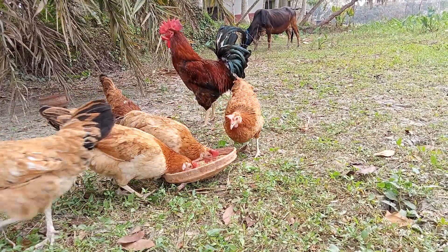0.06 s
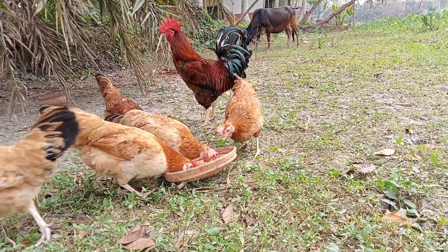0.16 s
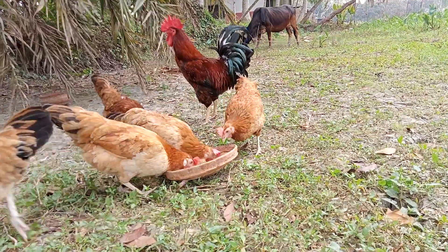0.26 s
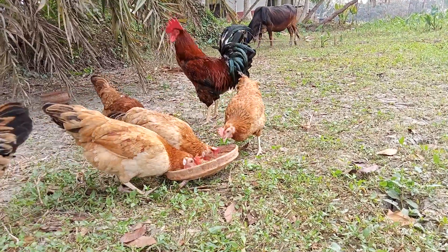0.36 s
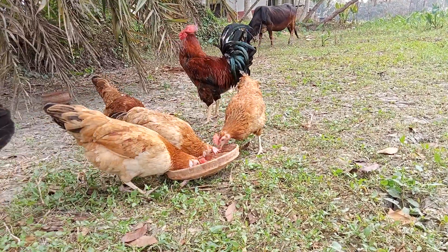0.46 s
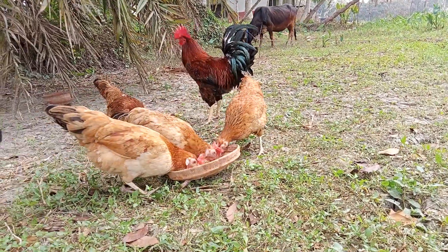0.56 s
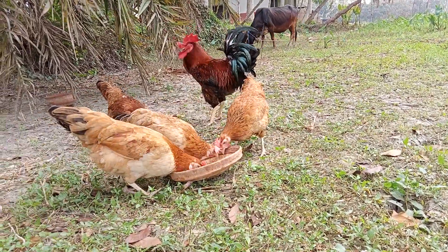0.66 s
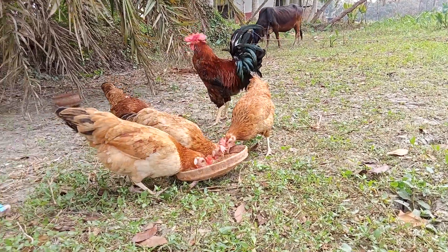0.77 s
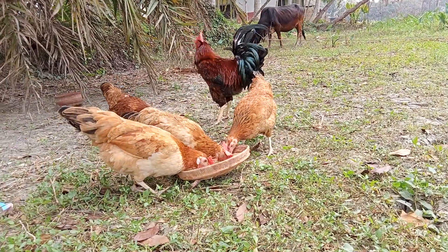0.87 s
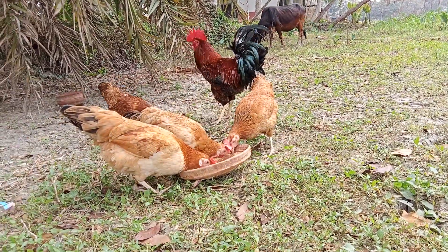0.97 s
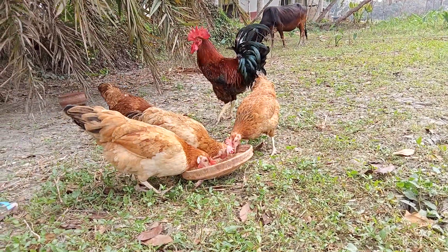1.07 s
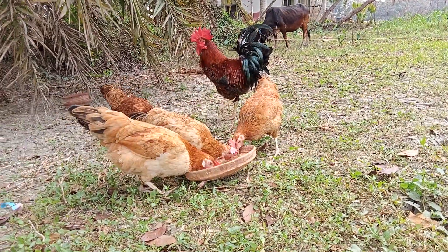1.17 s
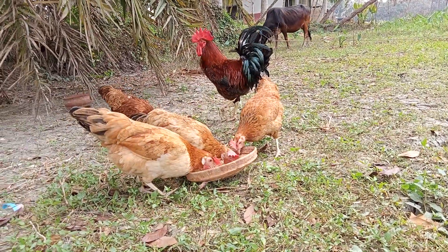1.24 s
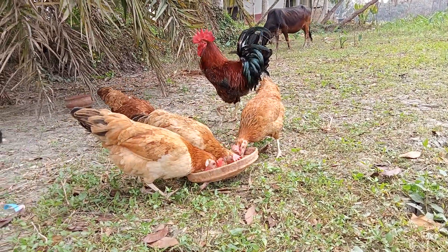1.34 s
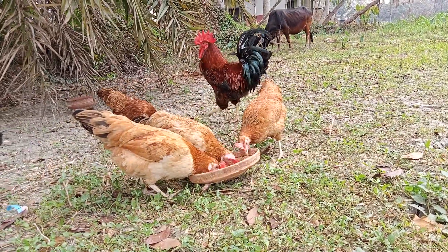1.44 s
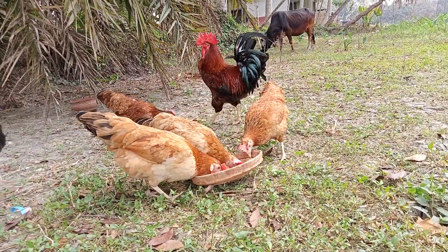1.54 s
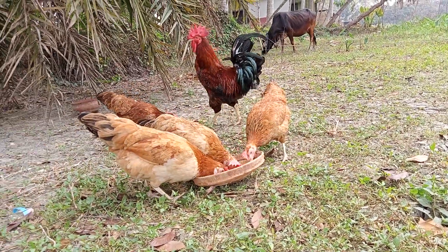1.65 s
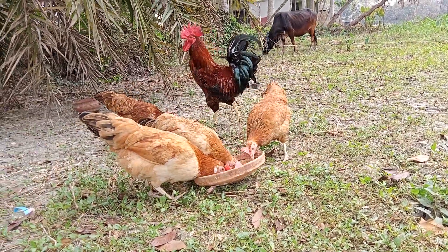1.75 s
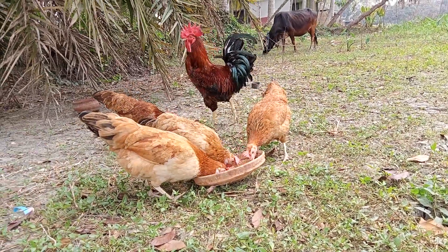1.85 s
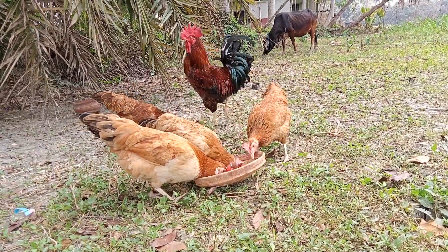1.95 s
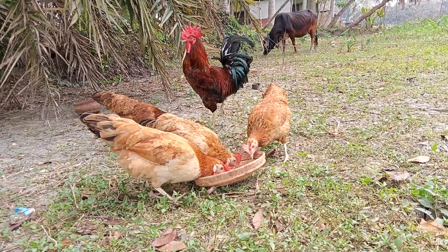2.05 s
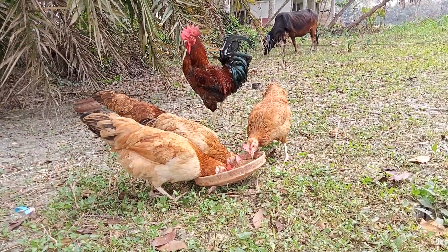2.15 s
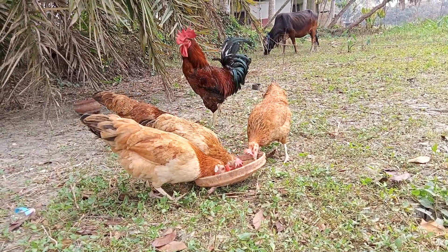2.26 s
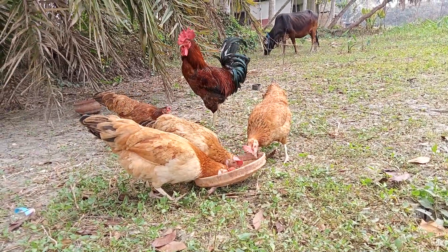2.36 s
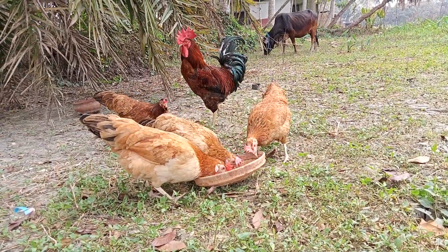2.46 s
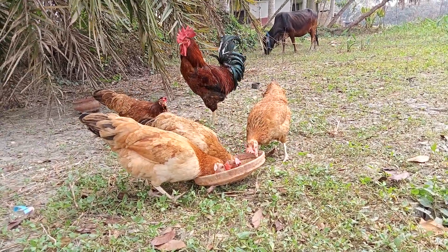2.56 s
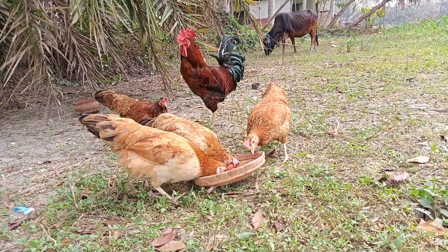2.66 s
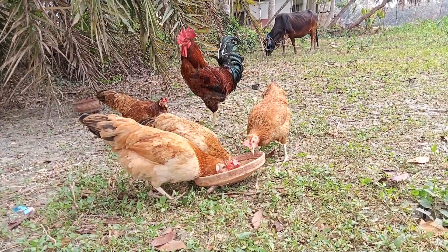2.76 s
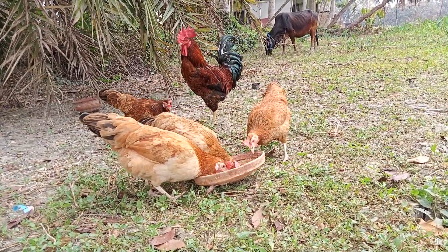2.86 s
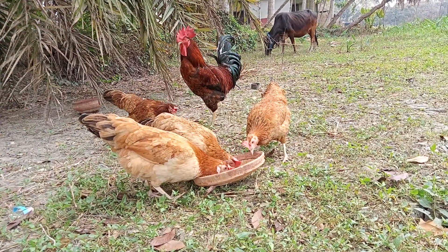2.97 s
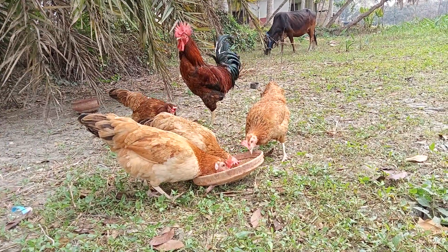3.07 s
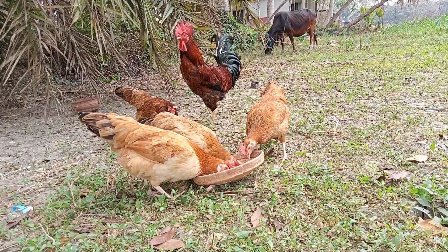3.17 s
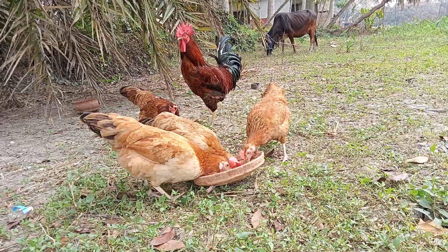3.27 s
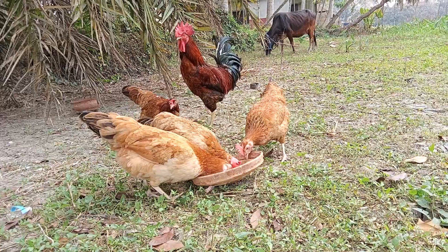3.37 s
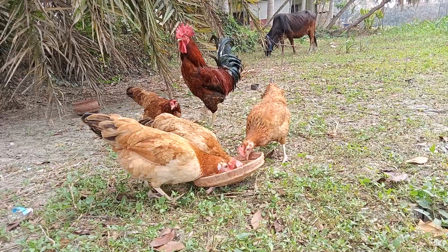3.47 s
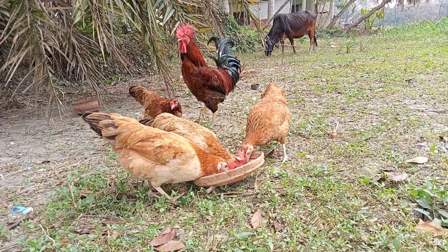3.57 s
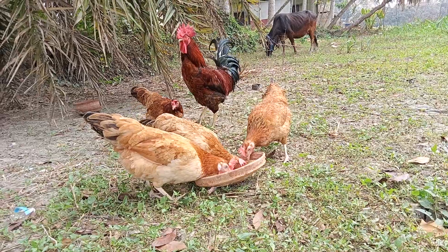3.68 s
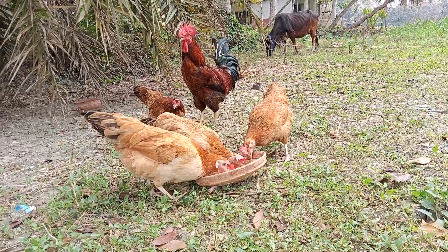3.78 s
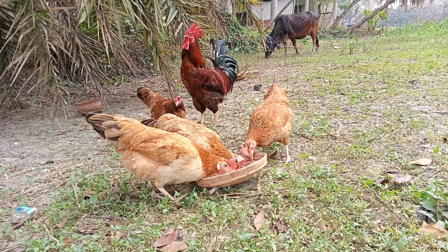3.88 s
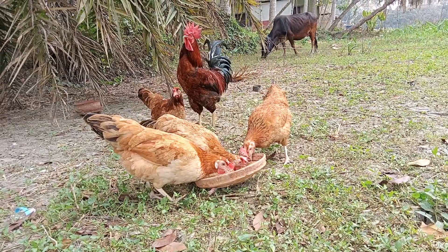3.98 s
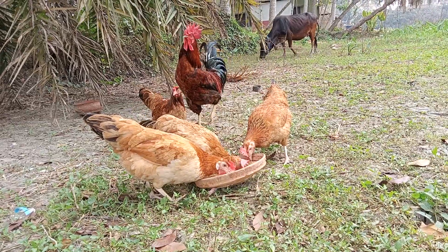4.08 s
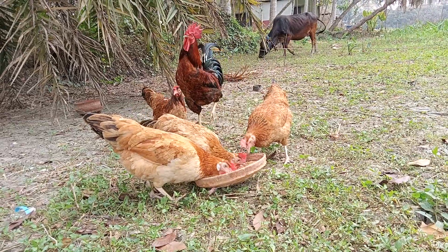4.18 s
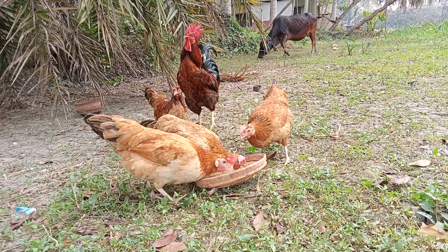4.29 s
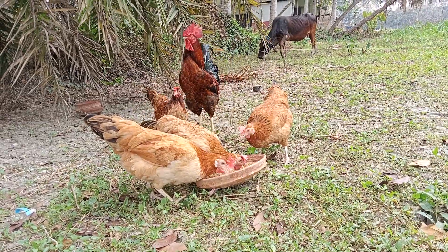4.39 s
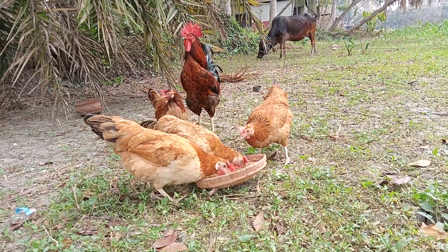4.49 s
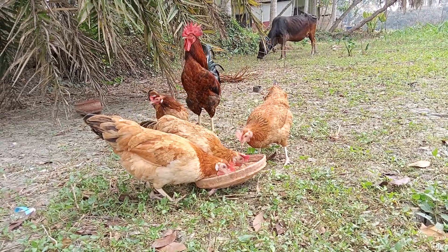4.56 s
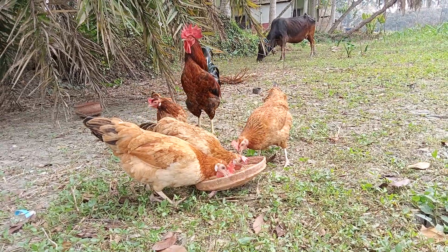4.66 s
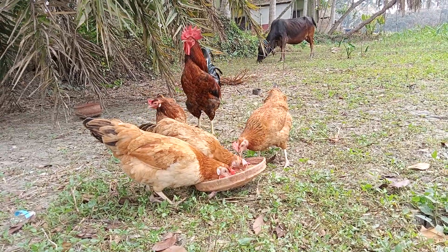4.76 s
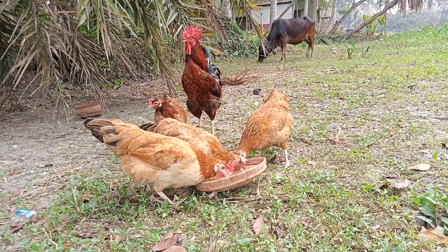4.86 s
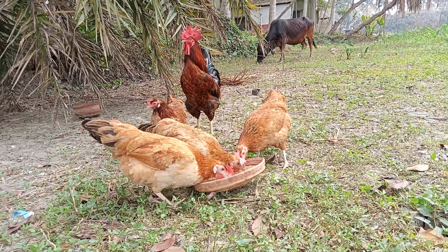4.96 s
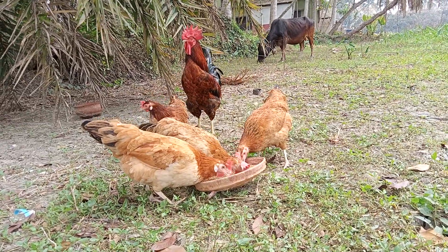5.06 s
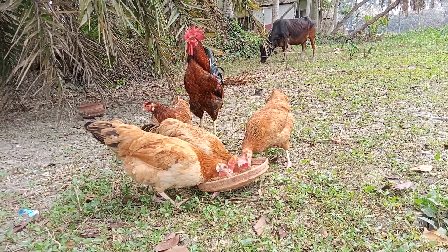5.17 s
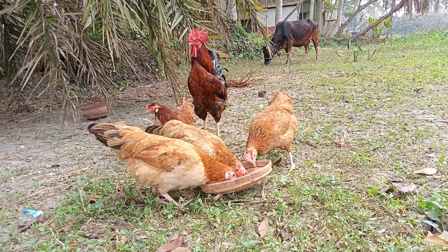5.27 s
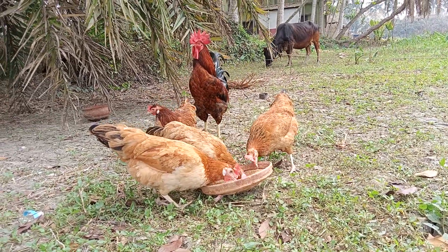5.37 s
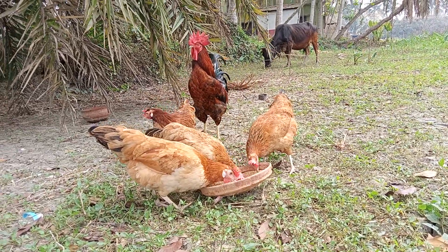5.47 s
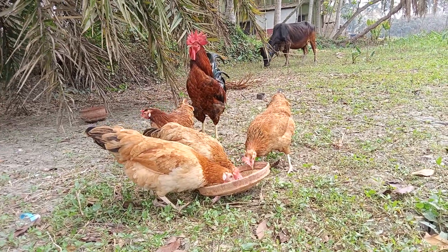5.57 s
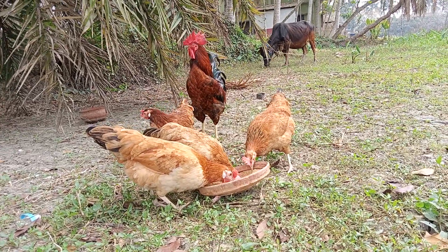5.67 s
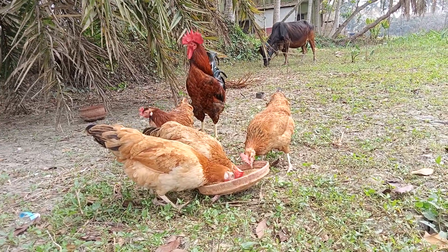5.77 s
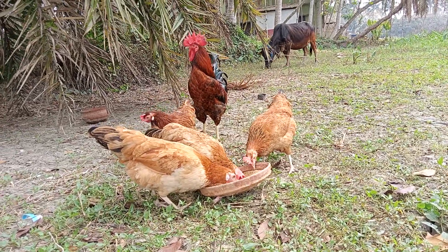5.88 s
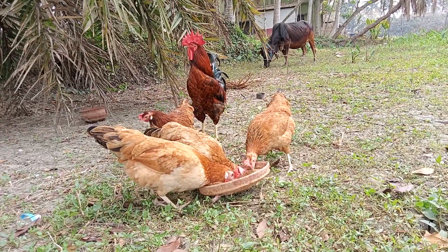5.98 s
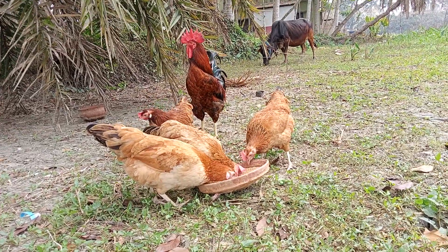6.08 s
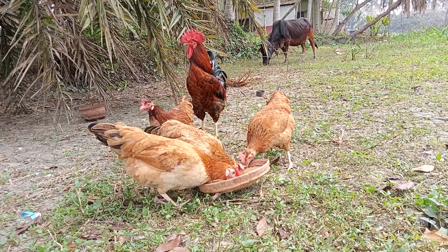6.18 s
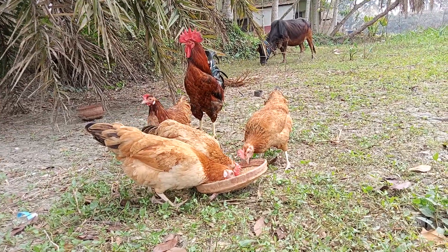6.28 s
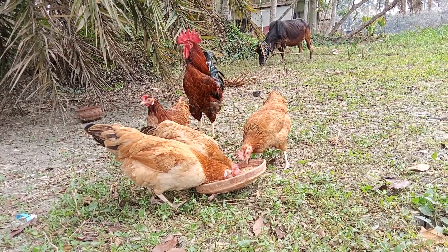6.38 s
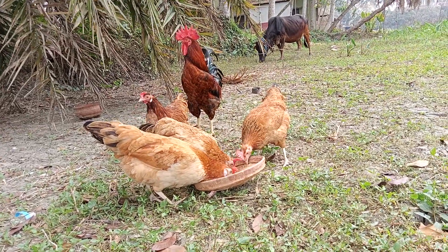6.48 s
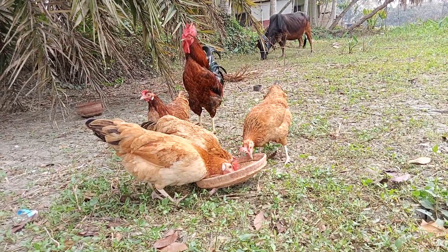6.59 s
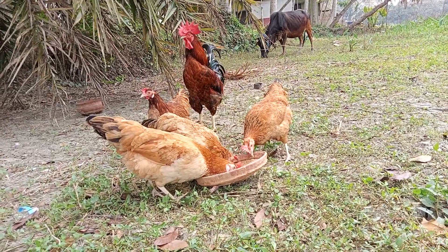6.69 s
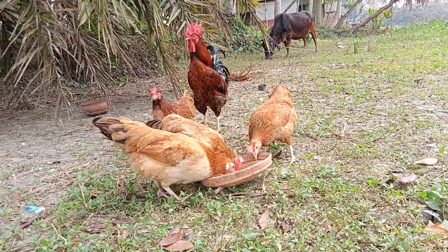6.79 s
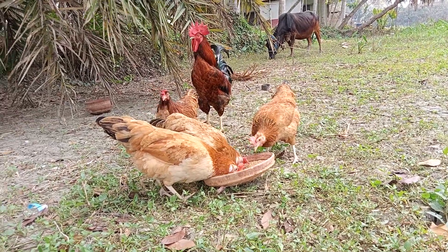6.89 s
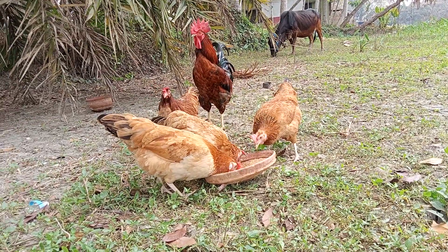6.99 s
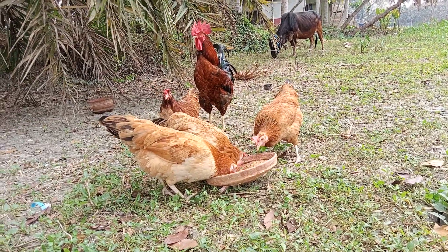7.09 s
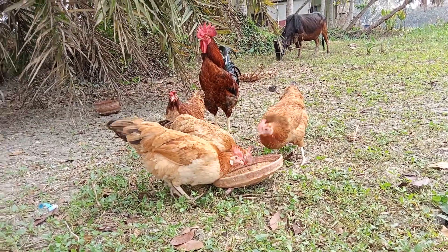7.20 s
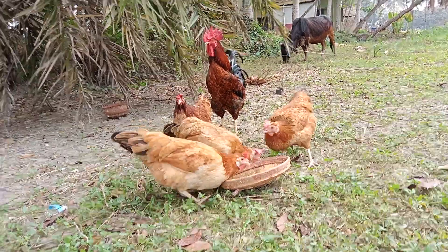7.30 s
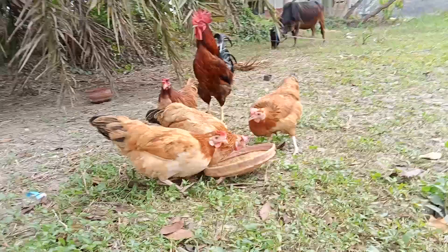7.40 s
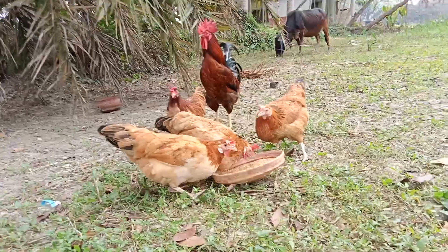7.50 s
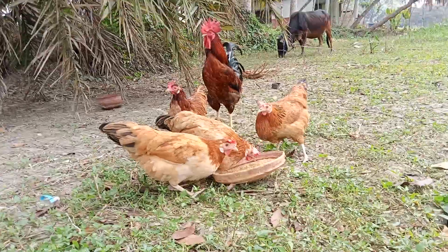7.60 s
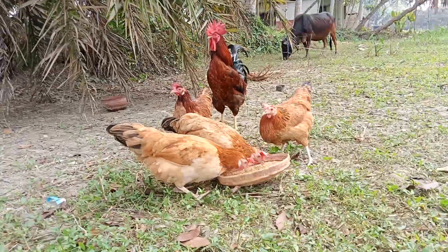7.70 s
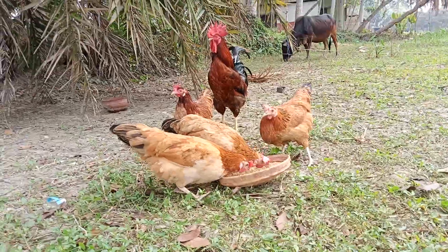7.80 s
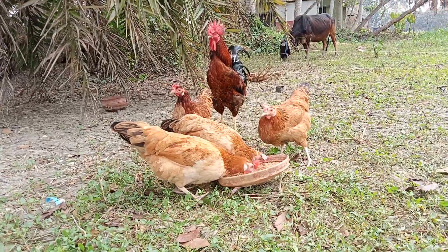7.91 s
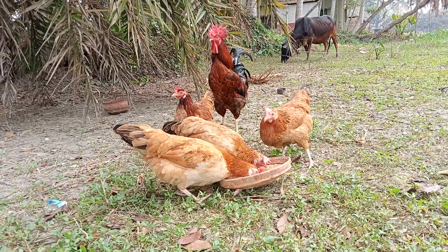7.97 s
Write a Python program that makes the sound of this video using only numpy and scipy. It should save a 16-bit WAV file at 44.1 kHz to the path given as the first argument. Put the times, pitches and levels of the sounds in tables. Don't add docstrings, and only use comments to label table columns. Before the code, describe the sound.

A steady, faint engine putter and soft yard hiss lie beneath birdsong and feeding chickens. Beaks tap lightly on clay, crack grain and stir dry grass; a hen gives one tiny low cluck around two and a half seconds. Echoing birds alternate buzzing downward calls with short three-note phrases and thin whistles. Low wind bumps touch the open-air microphone, and a loud sharp knock lands just before seven seconds, followed by denser pecking and rustling.

```python
import sys
import numpy as np
from scipy import signal
from scipy.fft import rfft, irfft, next_fast_len
from scipy.io import wavfile
from scipy.ndimage import uniform_filter1d

SR = 44100
rng = np.random.default_rng(int(sys.argv[2]) if len(sys.argv) > 2 else 0)


def nominal_scale(level):
    x = np.asarray(level, float) / 20
    return 10 ** x


def store_wav(level_fs):
    pcm = np.round(np.clip(np.atleast_2d(level_fs), -1, 1) * 32767)
    wavfile.write(sys.argv[1], SR, pcm.T.astype(np.int16))


N = 354563


def evened(x):
    return x / np.sqrt(np.mean(x ** 2) + 1e-20)


def add(mix, start_s, sound):
    part = mix[round(start_s * SR):][:len(sound)]
    part += sound[:len(part)]


def during(curve, start_s, sound):
    return curve[round(start_s * SR):][:len(sound)]


def coloured(x, points):
    point_hz, db = np.transpose(points)
    size = next_fast_len(len(x), True)
    hz = np.fft.rfftfreq(size, 1 / SR)
    gain = nominal_scale(np.interp(np.log(hz + 1), np.log(point_hz), db))
    return irfft(rfft(x, size) * gain, size)[:len(x)]


def wander(rate_hz):
    size = max(int(SR / rate_hz), 1)
    return evened(uniform_filter1d(uniform_filter1d(rng.standard_normal(N), size), size))


def ring(modes):
    t = np.arange(0, max(mode[-1] for mode in modes), 1 / SR)
    return sum(nominal_scale(db - 60 * t / t60) * np.sin(2 * np.pi * hz * t) for hz, db, t60 in modes)


def patchy(x, depth_db, tall, long):
    z = signal.stft(x, nperseg=256)[2]
    patches = uniform_filter1d(rng.standard_normal(z.shape), int(tall), 0)
    patches = evened(uniform_filter1d(patches, int(long), 1))
    return evened(signal.istft(z * nominal_scale(depth_db * patches), nperseg=256)[1][:N])


def swells(rows, floor_db):
    t, power = np.arange(N) / SR, nominal_scale(2 * floor_db)
    for start, end, db, rise, fall in rows:
        outside = np.maximum((start - t) / rise, (t - end) / fall)
        power = power + nominal_scale(2 * db - 40 * np.maximum(outside, 0))
    return np.sqrt(power)


# pitch_hz, level_db
TOP_EDGE = [(15600, 0), (15780, -70)]
# loudest_s, level_db, rise_20db_s, fall_20db_s
GUSTS = [(0.0, -52, .1, .19), (.29, -59, .4, .9), (.56, -50, .12, .15), (.86, -40, .1, .3),
         (.94, -42, .2, .16), (1.64, -53, .15, .7), (2.21, -53, .46, 1.1), (2.91, -54, .12, .3),
         (3.72, -56, 1.9, .3), (4.25, -54.5, .7, 1.1), (4.5, -47, .12, .15), (5.3, -53, .9, .09),
         (5.47, -56, .12, 1.9), (6.9, -44, .045, .05), (6.95, -53, .5, .4), (7.115, -45, .08, .1),
         (7.3, -58, .3, .6), (8.04, -60, .2, .1)]
# pitch_hz, level_db (per Hz)
WIND_TONE = [(20, -63), (40, -10), (62, 2), (90, 8), (130, -2), (250, -15), (500, -43), (2000, -90)]
# pitch_hz, level_db (per Hz)
YARD_TONE = [(60, -48), (150, -2), (254, -7), (420, -17), (700, -19.5), (900, -14), (2300, -17.5),
             (3250, -19), (3700, -25), (4500, -29), (5100, -40), (7500, -45.5), (8700, -36), (10500, -52)]


def air():
    calm_db, yard_db = -72, -57.1
    wind = evened(coloured(rng.standard_normal(N) * nominal_scale(2.4 * wander(6.3)), WIND_TONE))
    gusts = nominal_scale(-2.5) * swells([(s, s, *rest) for s, *rest in GUSTS], calm_db)
    wash = patchy(coloured(rng.standard_normal(N), YARD_TONE), depth_db=1.5, tall=2.5, long=24)
    return gusts * wind + nominal_scale(yard_db + 1.45 * wander(4.1)) * coloured(wash, TOP_EDGE)


# cycle_share, peak_db
PUFFS = [
    (0.0, -49),
    (0.108, -57.5),
    (0.253, -62.5),
    (0.431, -51.5),
]
# pitch_hz, level_db, decay_60db_s
PIPE = [(141.4, -4, 0.16), (180.6, 5, 0.035), (107, -18, 0.017), (236, -8, 0.03)]
# cycle_share, peak_db
VALVES = [
    (.09, -52.5),
    (.22, -57.5),
    (.42, -52.5),
    (.69, -57),
]
# pitch_hz, level_db, decay_60db_s
CASING = [(762, -2.5, 0.19), (888, -1, 0.16), (1133, -5.5, 0.049), (1430, -0.5, 0.12), (978, -2, 0.13)]


def engine_hits(table):
    cycle_hz, hits = 11.8825, np.zeros(N)
    cycles = np.arange(int(cycle_hz * N / SR))
    for share, db in table:
        late, size = rng.standard_normal((2, len(cycles)))
        at = (((cycles + share) / cycle_hz - .0015 + .0006 * late) * SR).astype(int)
        hits[np.maximum(at, 0)] = nominal_scale(db + 3.0 * np.clip(size, -3, 1.3))
    return hits


def engine():
    soft = signal.windows.hann(90)
    puffs = signal.fftconvolve(engine_hits(PUFFS), np.convolve(ring(PIPE), soft / soft.sum()))[:N]
    puffs = coloured(puffs, [(30, -43), (70, 1.5)])
    return puffs + signal.fftconvolve(engine_hits(VALVES), nominal_scale(-9.5) * ring(CASING))[:N]


# pitch_hz, level_db (per Hz)
RUSTLE_TONE = [(1760, -34), (3000, 0), (3260, 2.5), (3670, 0.5), (4940, -5.5), (5710, -11.5), (7700, -8),
               (8800, 3), (9700, -11), (12300, -12), (13400, -13), (15000, -6), (15700, -10)]
# loudest_s, level_db, rise_20db_s, fall_20db_s
STIRS = [(0.0, -63.5, .1, .2), (.15, -67, .11, .17), (1.23, -66.5, .055, .2), (1.54, -71.5, .28, .14),
         (1.62, -66.5, .03, .05), (1.75, -66, .046, .17), (1.95, -72, .36, .09), (2.63, -65, .033, .044),
         (2.79, -71, .03, .03), (3.0, -74, .03, .06), (3.4, -65.5, .05, .2), (3.35, -72, .2, .1),
         (3.55, -68.5, .14, .5), (3.83, -66, .03, .15), (3.99, -68, .06, .02), (4.07, -52.5, .033, .036),
         (4.34, -68, .145, .022), (4.42, -69, .15, .1), (4.59, -66.5, .08, .13), (4.79, -72, .12, .1),
         (5.09, -60, .06, .075), (5.19, -65, .07, .05), (5.62, -62.5, .27, .15), (5.69, -56, .076, .14),
         (7.0, -60, .1, .05), (7.118, -51, .1, .04), (7.152, -52, .03, .03), (7.37, -69, .1, .6),
         (7.62, -50.5, .07, .06), (8.04, -67, .08, .1)]
# start_s, end_s, level_db, edge_20db_s
SHUFFLES = [
    (.2, .55, -77, .3),
    (2.1, 2.35, -76, .4),
    (2.66, 3.1, -79, .1),
    (3.195, 3.25, -70, .03),
    (4.92, 5.06, -70, .08),
    (5.8, 6.02, -75, .07),
    (7.04, 7.16, -59.5, .12),
    (7.65, 7.795, -63.5, .05),
    (7.825, 7.94, -63.5, .05),
]


def rustle():
    still_db = -84
    sizes = nominal_scale(2.2 * np.minimum(rng.exponential(1, N), 4.5))
    grains = rng.standard_normal(N) * sizes * (rng.random(N) < .07)
    clumps = nominal_scale(0.43 * wander(60) + 1.83 * wander(250))
    sound = coloured(grains * clumps, [(400, -12), (900, 3), (2000, 4)] + RUSTLE_TONE[1:])
    sound = coloured(patchy(sound, depth_db=3.0, tall=14, long=4.6), TOP_EDGE)
    rows = [(s, s, *rest) for s, *rest in STIRS] + [(*row, row[-1]) for row in SHUFFLES]
    return nominal_scale(5.0) * swells(rows, still_db) * sound


def buzz(db, hz, centre_hz, width_hz, uneven_db, rough, lowest_hz):
    jitter = evened(uniform_filter1d(rng.standard_normal(len(hz)), 150))
    turns, stack = np.cumsum(hz * (1 + rough * jitter)) / SR, 0
    highest_hz = np.minimum(centre_hz + width_hz, 3300)
    for k, (a, b) in zip(range(7, 19), rng.random((12, 2))):
        flicker_db = uneven_db * np.sin(2 * np.pi * (a + (0.37 + b) * np.linspace(0, 1, len(hz))))
        cut_db = 0.099 * np.maximum(lowest_hz - k * hz, 0) + .07 * np.maximum(k * hz - highest_hz, 0)
        throat_db = -11.8 * ((k * hz - centre_hz) / width_hz) ** 2
        stack += nominal_scale(flicker_db - cut_db + throat_db) * np.cos(2 * np.pi * k * turns)
    power = uniform_filter1d(stack ** 2, 900)
    return nominal_scale(db) * stack / np.sqrt(power) * signal.windows.tukey(len(hz), .25)


# start_s, length_s, level_db
OPENERS = [
    (0.096, 0.11, -55.5),
    (0.864, 0.07, -56.5),
    (1.977, 0.096, -54.5),
    (2.973, 0.056, -54.5),
    (4.052, 0.086, -59),
    (5.076, 0.063, -57),
    (6.169, 0.078, -55),
    (7.401, 0.07, -53),
]


def opening_buzzes(far):
    for s, length, db in OPENERS:
        hz = 266 * np.linspace(1.01, .995, int(length * SR))
        add(far, s, buzz(db - 1.5, hz, 2820, width_hz=760, uneven_db=6, rough=.015, lowest_hz=2100))


# start_s, length_s, level_db, sag_time_s, final_throat_hz
GLIDES = [
    (0.186, .175, -49, .051, 2440),
    (0.955, .134, -47, .048, 2600),
    (2.066, .14, -46.5, .06, 2360),
    (4.147, .185, -52.5, .07, 2430),
    (5.158, .144, -45.5, .055, 2650),
]
THIN_HZ = [230, 220, 230, 100, 230]


def glides(far):
    rate_top_hz, rate_low_hz = 263, 197
    throat_top_hz, throat_lag = 3310, 1.2
    open_hz, opening_s = 390, .09
    throb_db, throb_s, first_throb_s, onset_db = 2.5, .068, .048, 4
    for (s, length, db, sag, low_hz), thin_hz in zip(GLIDES, THIN_HZ):
        t = np.arange(0, length, 1 / SR)
        hz = rate_low_hz + (rate_top_hz - rate_low_hz) * np.exp(-(t / sag) ** 1.5)
        centre_hz = low_hz + (throat_top_hz - low_hz) * np.exp(-(t / (throat_lag * sag)) ** 1.5)
        level_db = db + throb_db * np.cos(2 * np.pi * (t - first_throb_s) / throb_s)
        level_db -= onset_db * np.maximum(1 - t / first_throb_s, 0) + 2.5 * (t / length) ** 4
        width_hz = thin_hz + (open_hz - thin_hz) * np.minimum(t / opening_s, 1)
        add(far, s, buzz(level_db, hz, centre_hz, width_hz, uneven_db=4.0, rough=.01, lowest_hz=2310))


def whistle(length, start_hz, middle_hz, end_hz, db, late, pointed=1.7):
    u = np.arange(0, 1, 1 / (length * SR))
    hz = np.polyval(np.polyfit([0, .5, 1], [start_hz, middle_hz, end_hz], 2), u)
    return nominal_scale(db + 4) * np.sin(2 * np.pi * np.cumsum(hz) / SR) * np.sin(np.pi * u ** late) ** pointed


def falling(length, start_hz, end_hz, db, bend, late, pointed):
    return whistle(length, start_hz, end_hz + bend * (start_hz - end_hz), end_hz, db, late, pointed)


# first_note_s, first_gap_s, second_gap_s, level_db, second_note_lift_db
PHRASES = [
    (0.483, .058, .072, -46.5, -1.5),
    (1.24, .061, .069, -48, -2.5),
    (3.344, .069, .077, -47.5, -1.5),
    (4.118, .063, .069, -49, 2.5),
    (4.856, .062, .066, -47, -3),
    (5.611, .065, .069, -49, -2),
    (6.359, .061, .07, -45.5, -.6),
    (7.117, .058, .068, -47, 2.1),
    (7.864, .064, .066, -49, -.6),
]
# length_s, start_hz, middle_hz, end_hz
NOTE_SHAPES = [
    (.036, 1400, 1305, 850),
    (.029, 1225, 1135, 860),
    (.044, 1150, 1230, 1270),
    (.034, 1270, 1160, 900),
]
FALLING_ENDS = [0, 2]


def phrases(near):
    late, last_note_db = 1.25, -4
    scatter = .9 + .4 * wander(150)
    for phrase, (first, gap, last_gap, db, lift_db) in enumerate(PHRASES):
        second = first + gap
        notes = (first, db), (second, db + lift_db), (second + last_gap, db + lift_db / 2 + last_note_db)
        for place, (s, note_db) in enumerate(notes):
            length, *pitches = NOTE_SHAPES[place + (place == 2 and phrase in FALLING_ENDS)]
            tone = whistle(length, *pitches, note_db + 1.2, late, pointed=2.2)
            peak_s = .5 ** (1 / late) * length
            add(near, s - .0015 - peak_s, tone * (0.5 + 0.6 * during(scatter, s, tone)))


# start_s, length_s, start_hz, end_hz, level_db
WHISTLES = [(2.37, .22, 3170, 3140, -66.5), (2.54, .26, 3140, 2480, -65.5), (2.2, .07, 2380, 2370, -57),
            (6.335, .065, 2500, 1980, -57), (6.36, .07, 2400, 2200, -60), (5.95, .22, 3240, 3180, -67),
            (3.048, .042, 2800, 2760, -59), (2.978, .04, 4300, 4200, -70), (3.115, .02, 2850, 2700, -60),
            (6.7, .04, 2780, 2650, -63), (6.34, .055, 2790, 2750, -53), (6.42, .12, 2770, 2740, -67),
            (7.16, .04, 2440, 2200, -50), (6.845, .1, 2380, 2200, -60), (6.84, .085, 2700, 2400, -61),
            (6.88, .04, 2470, 2390, -58), (7.195, 0.12, 2380, 2280, -56), (7.235, 0.085, 2090, 1970, -56.5),
            (7.385, 0.13, 1920, 1800, -60), (7.565, .06, 2250, 1880, -56), (7.57, .07, 2420, 2260, -57),
            (7.565, .035, 2790, 2820, -56)]


def thin_whistles(far):
    haze = .75 + .55 * wander(320)
    for s, *shape in WHISTLES:
        tone = falling(*shape, bend=.43, late=0.74, pointed=.8)
        add(far, s, tone * during(haze, s, tone))


# start_s, length_s, start_hz, end_hz, level_db
SLIDES = [
    (6.288, .065, 3110, 2750, -50),
    (7.497, .082, 3330, 2740, -50),
    (7.838, .084, 3740, 3470, -54),
    (3.099, .008, 3500, 2700, -49),
    (3.086, .022, 4400, 3850, -66),
]


def slides(clear, flutter):
    for s, *shape in SLIDES:
        tone = falling(*shape, bend=.22, late=.9, pointed=.6)
        add(clear, s, tone * during(flutter, s, tone))


# start_s, length_s, high_hz, low_hz, level_db
SWOOPS = [
    (6.715, .29, 2480, 1550, -58),
    (7.15, .12, 2400, 1820, -56),
]


def swoops(near, flutter):
    drop_at, drop_width = .31, .07
    for s, length, high_hz, low_hz, db in SWOOPS:
        u = np.arange(0, 1, 1 / (length * SR))
        hz = low_hz + (high_hz - low_hz) / (1 + np.exp((u - drop_at) / drop_width))
        tone = nominal_scale(db + 4) * np.sin(2 * np.pi * np.cumsum(hz) / SR) * np.sin(np.pi * u ** .85) ** .8
        add(near, s, tone * during(flutter, s, tone))


# delay_s, level_db
TREES = [
    (.062, -14),
    (0.112, -21),
    (.17, -36),
]


def tree_echo():
    t = np.arange(SR // 2) / SR
    tail = rng.standard_normal(len(t)) * nominal_scale(-60 * t / .34) * np.minimum(t / .012, 1)
    tail *= nominal_scale(-6.5) / np.linalg.norm(tail)
    crown = rng.standard_normal(12) * signal.windows.hann(12)
    for delay, db in TREES:
        add(tail, delay, nominal_scale(db) * crown / np.linalg.norm(crown))
    return tail


def birds():
    far, near, clear = np.zeros((3, N))
    flutter = nominal_scale(1.4 * wander(45))
    opening_buzzes(far)
    glides(far)
    phrases(near)
    thin_whistles(far)
    slides(clear, flutter)
    swoops(near, flutter)
    echoing = far + nominal_scale(-2.5) * near + nominal_scale(-8) * clear
    return far + near + clear + signal.fftconvolve(echoing, tree_echo())[:N]


# pitch_hz, level_db
CRACK_TONE = [(1200, -13), (2500, 3.5), (4000, -3.5), (6000, -19), (8900, -3.5), (10500, -6), (15000, -8),
              (15700, -11), (15900, -23), (16500, -40), (16700, -80)]
# start_s, peak_db
SNAPS = [(.1007, -55), (.6659, -58), (1.2072, -57), (1.258, -54), (1.275, -50), (1.289, -56), (1.3179, -54),
         (1.482, -57), (1.508, -56), (1.556, -56), (1.576, -55), (1.6053, -54), (1.8886, -55), (1.957, -53),
         (1.991, -56), (2.6209, -52), (2.6788, -54), (3.3238, -54), (3.6356, -55), (3.9599, -56),
         (4.5695, -55), (4.5755, -53), (4.6598, -56), (5.4485, -54), (5.5443, -52), (7.181, -47),
         (7.3306, -57), (7.3575, -50), (7.4189, -53), (7.4882, -57), (1.7209, -52), (2.1809, -60),
         (2.5131, -61), (2.7855, -56), (2.998, -60), (3.0793, -58), (3.895, -57), (3.9808, -55),
         (4.1983, -57), (4.3933, -56), (7.0218, -48), (7.0931, -38), (7.778, -50), (7.803, -50)]
# start_s, peak_db
TICKS = [(0.1391, -56), (0.1501, -47), (0.3042, -51), (1.2441, -57), (1.6197, -51), (1.8233, -52),
         (1.9076, -49), (1.939, -54), (2.6179, -51), (3.2173, -59), (3.5389, -56), (3.6222, -57),
         (3.814, -48), (4.0417, -44), (4.4147, -50), (4.6781, -49), (4.7749, -58), (4.9655, -53),
         (5.0603, -54), (5.187, -53), (5.5392, -56), (5.6684, -49), (7.0333, -52), (7.0477, -46),
         (7.0877, -44), (7.5676, -51), (7.7107, -54), (7.8209, -58), (7.8444, -49), (7.8728, -50)]
# start_s, peak_db, bowl_ring_hz,
# bowl_share_db, decay_60db_s (in the knock's two rows the ring is the housing's)
BLOWS = [(1.7454, -38, 3380, 5, .013), (3.1906, -56, 4270, 5, .015), (3.8292, -41, 3420, -21, .015),
         (4.0597, -37, 2300, -3, .015), (4.283, -48, 3950, 7, .012), (4.3095, -30, 3800, 2, .01),
         (4.3328, -25, 2750, -6, .008), (4.334, -20, 2600, -8, .01), (4.3335, -34, 10300, 4, .006),
         (4.335, -21, 4930, -10, .014), (4.3455, -46, 4200, 0, .01), (5.6399, -49, 4290, 1, .015),
         (5.6883, -44, 3780, 2, .015), (5.6958, -39, 4030, 4, .015), (6.9562, -3, 2450, -4, .008),
         (6.956, -12, 9200, 3, .005), (6.977, -21.5, 4400, -3, .012), (7.0605, -28.5, 3800, -2, .008),
         (7.1156, -27, 3300, -14, .012), (7.126, -38, 3260, 5, .01), (7.1495, -42, 3210, -13, .013),
         (7.374, -50, 3140, 6, .015), (7.601, -40, 3000, -12, .03), (7.6184, -21, 3900, -7, .012),
         (7.624, -28, 4900, -4, .012), (7.641, -38, 3850, -8, .015), (7.7256, -44, 4020, -14, .015)]
# start_s, level_db, ring_hz, decay_60db_s
SOFT_TAPS = [(1.2855, -48.5, 2230, 0.038), (3.039, -54, 2420, 0.05), (3.104, -52, 3100, 0.06),
             (3.5051, -51.5, 2350, 0.05), (4.058, -48, 2150, .03), (4.058, -49, 780, .035),
             (4.8585, -53, 1935, 0.061), (7.03, -52, 1950, .04), (7.072, -48, 1950, 0.045),
             (7.086, -44.5, 700, 0.04), (7.098, -52, 880, .04), (7.06, -54, 1500, .03),
             (7.093, -49, 3150, .04), (7.095, -51, 2200, .05), (7.6184, -48, 1830, .04)]


def pecks():
    low_hz, span_hz = 3200, 1000
    crack, bowl, t = np.zeros(N), np.zeros(N), np.arange(1500) / SR
    spots = rng.random(len(TICKS)) ** 2
    hits = BLOWS + [(s, db, low_hz + span_hz * spot, -7, .015) for (s, db), spot in zip(TICKS, spots)]
    hits += [(s, db, low_hz + span_hz, -14, .006) for s, db in SNAPS]
    for s, db, hz, bowl_db, t60 in hits:
        noise = rng.standard_normal(len(t))
        add(crack, s, nominal_scale(db - 4.5 - 60 * t / t60) * (noise - 2.5 * (t == 0)))
        add(bowl, s, nominal_scale(db + bowl_db - 8) * ring([(hz, 0, 1.4 * t60), (1.51 * hz, -11, 1.0 * t60)]))
    for s, db, hz, t60 in SOFT_TAPS:
        tap = ring([(hz, 0, t60), (1.08 * hz, -3, t60)])
        soft_start = np.minimum(np.arange(len(tap)) / (.0015 * SR), 1)
        add(bowl, s, nominal_scale(db + 4.5) * tap * soft_start)
    return bowl + coloured(crack, CRACK_TONE)


# start_s, level_db, rise_s, fall_s
KNOCKS = [
    (6.95605, 15.5, 0.00007, 0.0021),
    (5.3, -31, 0.0034, .006),
    (5.5, -25, 0.0059, .007),
    (.84, -29, 0.0025, .005),
    (.925, -33, .003, .005),
    (7.087, -33, .0004, .002),
    (7.112, -21, .004, .006),
    (7.125, -30, .002, .004),
]


def knock():
    t, out = np.arange(SR // 8) / SR, np.zeros(N)
    for s, db, rise, fall in KNOCKS:
        sharpness = 3 if rise < .0002 else 1
        add(out, s, nominal_scale(db) * (1 - np.exp(-t / rise)) ** sharpness * np.exp(-t / fall))
    for hz, damping in ((75, 0.67), (44.7, 0.98)):
        turn = 2 * np.pi * hz
        low_cut = signal.bilinear([1, 0, 0], [1, 2 * damping * turn, turn ** 2], SR)
        out = signal.lfilter(*low_cut, out)
    return coloured(out, [(15500, 0), (15800, -18), (16500, -30), (16800, -80)])


# time_s, level_db, pitch_hz, octave_share_db
CLUCK = [
    (2.472, -66, 254, -6),
    (2.49, -45, 307, -17),
    (2.503, -60, 271, 7),
    (2.52, -60, 270, 3),
]


def cluck():
    times, *columns = np.transpose(CLUCK)
    t = np.arange(times[0], times[-1], 1 / SR)
    db, hz, octave_db = (np.interp(t, times, column) for column in columns)
    phase, out = 2 * np.pi * np.cumsum(hz) / SR, np.zeros(N)
    voice = np.sin(phase) + nominal_scale(octave_db) * np.sin(2 * phase)
    add(out, times[0], nominal_scale(db + 2.5) * voice * signal.windows.tukey(len(hz), .3))
    return out


def scene():
    return (air() + engine() + rustle() + birds() + pecks() + knock() + cluck())[None]


def roll_off(x):
    return signal.sosfilt(signal.butter(12, 16620, fs=SR, output="sos"), x)


def record(dry):
    ahead, hold = int(.0145 * SR), int(.06 * SR)
    over = np.convolve(abs(dry[0]) > 1, np.ones(ahead + hold))[ahead:][:N] > .5
    limited = dry * nominal_scale(-14 * uniform_filter1d(over * 1., 330))
    return roll_off(limited)


dry = scene()
out = record(dry)
store_wav(out)
```